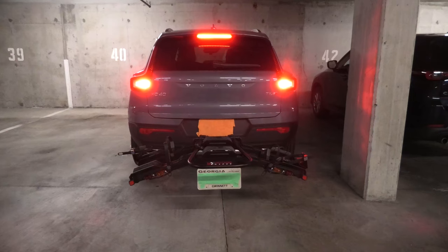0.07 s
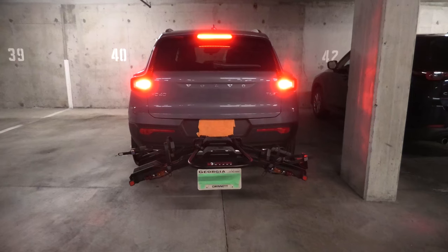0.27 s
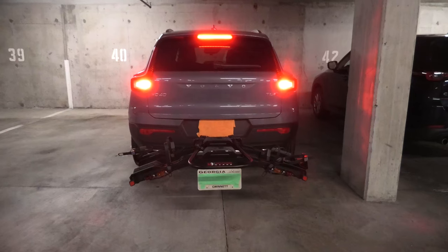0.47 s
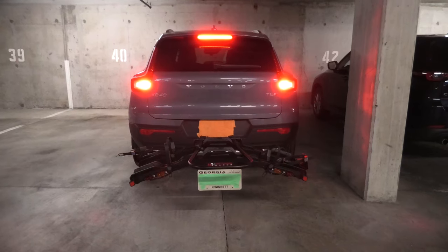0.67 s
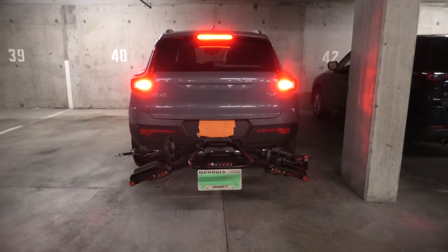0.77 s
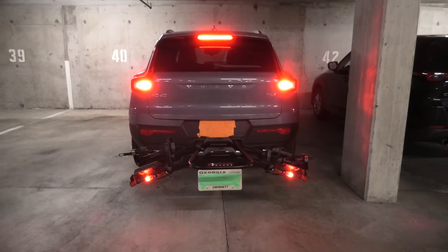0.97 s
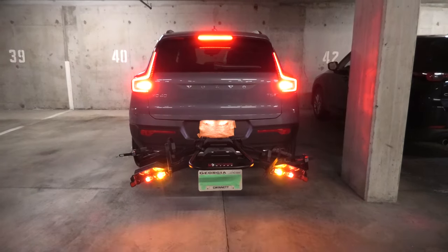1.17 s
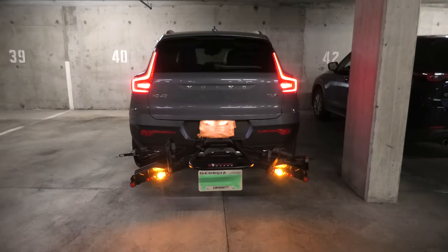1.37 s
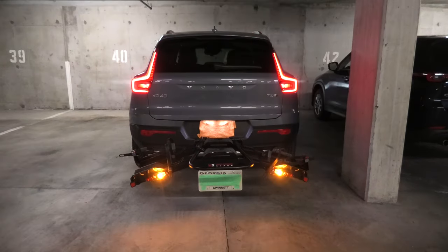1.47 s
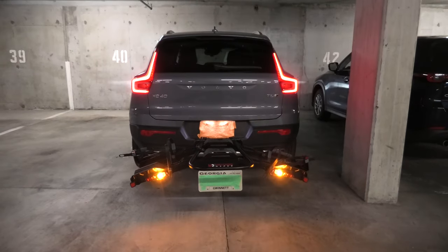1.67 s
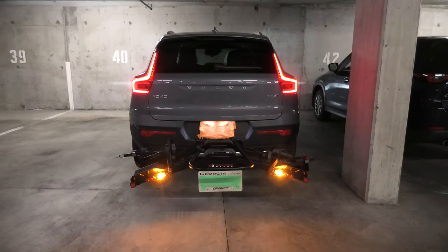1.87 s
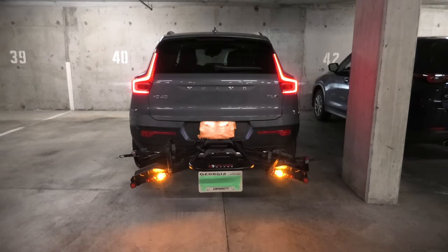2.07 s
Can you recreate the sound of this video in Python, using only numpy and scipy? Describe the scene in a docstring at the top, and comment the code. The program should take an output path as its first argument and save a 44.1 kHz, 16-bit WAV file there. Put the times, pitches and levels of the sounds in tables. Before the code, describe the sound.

Car starting up, heard from behind, its starter grinding before the engine flares and settles, echoing off concrete

```python
"""A car is started in a concrete garage, heard from behind: over steady air noise the starter pinion clunks in,
the starter grinds through the compressions, the engine catches, flares and settles toward idle.
The clunks are ringing modes and rattle, the starter is gear-tooth knocks and hiss, the engine is firing orders
and noise bands that pulse with each firing. Walls and ceiling answer every part, in stereo."""
import sys
import numpy as np
from scipy import signal
from scipy.fft import rfft, irfft, next_fast_len
from scipy.io import wavfile
from scipy.ndimage import map_coordinates

SR = 44100
rng = np.random.default_rng(int(sys.argv[2]) if len(sys.argv) > 2 else 0)


def store_pcm(level_fs):
    """Save levels as 16-bit WAV."""
    pcm = np.round(np.clip(level_fs, -1, 1) * 32767).astype(np.int16)
    wavfile.write(sys.argv[1], SR, np.atleast_2d(pcm).T)


def voltage_ratio(decibels):
    """Convert decibels (scalar or array-like) to amplitude ratios, 20 dB per decade."""
    exponent = np.asarray(decibels, float) / 20
    return 10 ** exponent


N = 93977


def unit(x):
    """Scale to rms 1."""
    return x / np.sqrt(np.mean(x ** 2) + 1e-20)


def along(points, hz):
    """Read (Hz, value) points on a log frequency axis."""
    f, v = np.transpose(points)
    return np.interp(np.log(hz + 1), np.log(f + 1), v)


def curves(rows):
    """One value per sample for each column after the time."""
    s, *cols = np.transpose(rows)
    return [np.interp(np.arange(N) / SR, s, c) for c in cols]


def wobble(rate):
    """A smooth random curve, rate knots a second."""
    knots = rng.standard_normal(int(N * rate / SR) + 4)
    return map_coordinates(knots, [np.arange(N) * rate / SR])


def filtered(x, response):
    """Filter x by a response given as a function of frequency in Hz."""
    m = next_fast_len(N + SR // 2)
    return irfft(rfft(x, m) * response(np.fft.rfftfreq(m, 1 / SR)), m)[..., :N]


def coloured(x, spectrum):
    """Weight x by a spectrum, at rms 1."""
    return unit(filtered(x, lambda hz: voltage_ratio(along(spectrum, hz))))


def resonance(f, hz, width):
    """The causal response of one damped resonance, unity at its centre."""
    return 1j * f * width / (hz * hz - f * f + 1j * f * width)


def pulses(cycles, scatter, size_db, pattern_db=(0,)):
    """One impulse each time cycles passes a whole number, uneven in time (in cycles) and size."""
    whole = np.arange(int(cycles[-1]))
    draw = rng.standard_normal((len(whole), 2))
    at = np.interp(whole + scatter * draw[:, 0], cycles, np.arange(N)).astype(int)
    size = voltage_ratio(size_db * draw[:, 1] + np.resize(pattern_db, len(whole)))
    return np.bincount(at, size, N)


def air():
    """The garage's steady ventilation noise, partly shared by the two ears."""
    # Each row: frequency in Hz, level in dB per Hz.
    air_spectrum = [(24, -30), (45, -12), (135, -2), (180, -8), (240, 0), (382, -11), (502, -12), (659, -5),
                    (1170, -9), (1960, -16), (5250, -37), (15800, -33)]
    level_db = -47.5
    noise = rng.standard_normal((3, N))
    return voltage_ratio(level_db) * coloured(noise[0] + 0.44 * noise[1:], air_spectrum)


def garage(x):
    """Concrete walls: a different tail for each ear, each frequency dying at its own speed."""
    # How long the tail rings. Each row: frequency in Hz, time to fall 60 dB in seconds.
    decay_times = [(100, 3.5), (1000, 1.08), (4000, 1.64), (12000, 0.68)]
    # Tone of the walls. Each row: frequency in Hz, gain in dB on a tail of unit energy.
    wall_gain = [(30, -16), (125, -18), (300, -8), (700, -4), (1200, -1.5), (2500, -2), (5000, -10),
                 (8000, -13), (10500, -9), (13000, -9), (15000, -10)]
    hz, t, z = signal.stft(rng.standard_normal((2, SR)), SR, nperseg=256)
    decay = voltage_ratio(-60 * t / along(decay_times, hz)[:, None])
    tail = signal.istft(z * decay, SR, nperseg=256)[1]
    tail = np.pad(tail / np.linalg.norm(tail[0]), ((0, 0), (400, 0)))  # 400 samples before the answer
    tail = filtered(tail, lambda f: voltage_ratio(along(wall_gain, f)))
    return signal.fftconvolve(x[None], tail, axes=1)[:, :N]


def electric_whine():
    """A thin, steady-pitched electric whine switches on and flutters in level and phase."""
    hz, level_db, from_s, rise_s = 10000, -63, 1.5, 0.093
    t = np.arange(N) / SR
    level = np.clip((t - from_s) / rise_s, 0, 1) * voltage_ratio(level_db + 3.06 * wobble(30))
    return level * np.sin(2 * np.pi * hz * t + .8 * wobble(39.4))


def clunks():
    """The pinion hits the ring gear and bounces: ringing metal and a noisy rattle."""
    # The hits. Each row: start in seconds, gain in dB, rattle's time to fall 60 dB in seconds.
    hits = [(0.2292, -25, 0.14), (0.2409, -12.5, 0.037), (0.2446, -10, 0.034), (0.2615, -13, 0.029),
            (0.2649, -15.5, 0.035), (0.2694, -13.5, 0.046)]
    # The struck metal. Each row: frequency in Hz, mean relative level in dB, time to fall 60 dB in seconds.
    metal_modes = [(560, -6, .05), (855, -8, 0.03), (1130, 0, 0.04), (1430, 1, 0.055), (1800, -3, .04),
                   (2810, -3, 0.05), (6560, -4, 0.025), (8300, -14, .03)]
    # Tone of the rattle. Each row: frequency in Hz, level in dB per Hz.
    rattle_spectrum = [(150, -51), (250, -28), (518, -8), (1280, -7), (1440, -2), (1600, -6.5), (2690, -19),
                       (3260, -40), (4380, -17), (8030, -11.5), (15800, -24.5)]
    rise_s = 0.00099
    out, t = np.zeros(N + SR), np.arange(SR // 3) / SR
    rattle = coloured(rng.standard_normal(N), rattle_spectrum)
    for s, db, t60 in hits:
        ring = sum(voltage_ratio(lv + rng.normal(0, 3.0) - 60 * t / d) * np.sin(2 * np.pi * hz * t)
                   for hz, lv, d in metal_modes)
        i = round(s * SR)
        dying_rattle = voltage_ratio(-60 * t / t60) * rattle[i:i + len(t)]
        hit = 0.47 * ring / np.abs(ring).max() + 0.44 * dying_rattle
        out[i:i + len(t)] += voltage_ratio(db) * (1 - np.exp(-t / rise_s)) * hit
    return out[:N]


def starter():
    """Gear teeth knock the housing unevenly; the motor hisses; both fade once the engine runs."""
    # Cranking over time. Each row: time in seconds, gear growl in dB, three housing rings (near 560, 900
    # and 1400 Hz) in dB ahead of the trim below, hiss in dB, top of the hiss in dB.
    cranking = [(0.28, -29, -35, -32, -32, -32.5, -38), (0.302, -30, -36, -40, -40, -34, -44),
                (0.345, -29.5, -34, -27.5, -26.5, -34.5, -49), (0.396, -27, -35, -35, -40, -37, -50),
                (0.432, -30, -41, -47, -28.5, -36, -51), (0.48, -34, -35, -45, -28, -36.5, -53),
                (0.496, -30, -36, -32, -36, -38.5, -43.5), (0.54, -27.5, -43, -26, -39, -38, -48),
                (0.586, -33.5, -37, -30, -40, -36.5, -58), (0.612, -31, -35, -33, -43, -41, -54),
                (0.626, -29.5, -25.5, -49, -47, -37, -39.5), (0.646, -25, -40, -23, -37, -37, -41),
                (0.658, -31.5, -41, -28, -52, -37, -42), (0.698, -30, -30.5, -43, -53, -32.5, -44),
                (0.718, -31, -36, -36, -48, -39.5, -46), (0.736, -30.5, -43, -45, -62, -31.5, -40.5),
                (0.784, -37, -33, -32, -45, -31.5, -40.5), (0.804, -30, -43, -31, -53, -34.5, -37.5),
                (0.828, -33.5, -40, -41, -35, -36, -47), (0.846, -29.5, -31, -33, -33.5, -38.5, -38),
                (0.888, -35, -43, -54, -54, -39.5, -48.5), (0.95, -33, -40.5, -35, -40, -41.5, -49)]
    # Broad housing resonances. Each row: centre in Hz, width in Hz, level in dB.
    housing_modes = [(546, 73, -3), (1172, 120, -4.5), (2140, 160, -6), (2520, 54, -6)]
    # Rings that swell with load. Each row: centre in Hz, width in Hz ahead of squaring the response.
    load_rings = [(555, 110), (890, 200), (1410, 160)]
    # Tone of growl, hiss and top hiss. Each row: frequency in Hz, level in dB per Hz.
    growl_spectrum = [(30, -70), (90, -30), (170, -14), (385, -10), (550, -3), (707, -8), (890, -4),
                      (1030, -9), (1410, -7), (1640, -11), (2130, -7.5), (6000, -20), (7800, -45),
                      (13200, -120)]
    hiss_spectrum = [(2350, -9.5), (4000, -3), (5100, -12), (5730, -1), (6220, -4), (9300, -7),
                     (12100, -34), (20500, -120)]
    top_spectrum = [(5470, -14), (9300, -3.5), (11200, 1.5), (13600, -9), (15800, -12)]
    from_s, rise_s, dies_db_per_s = 0.2232, 0.02, 50
    teeth_per_s, tooth_scatter = 420, 0.439  # scatter as a share of the tooth spacing
    ring_trim_db = -5.5

    t = np.arange(N) / SR
    growl_db, *ring_db, hiss_db, top_db = curves(cranking)
    gate = np.clip((t - from_s) / rise_s, 0, 1)
    gate = gate * voltage_ratio(-dies_db_per_s * np.clip(t - cranking[-1][0], 0, None))
    teeth = pulses(t * teeth_per_s, tooth_scatter, size_db=0)

    def housing(f):
        """Resonances in alternating polarity, with the bass rolled off below 250 Hz."""
        modes = sum((-1) ** k * voltage_ratio(db) * resonance(f, c, w) for k, (c, w, db) in enumerate(housing_modes))
        return modes * f ** 2 / (f ** 2 + 250 ** 2)

    knocks = unit(filtered(teeth, housing))
    growl = unit(0.33 * knocks + coloured(rng.standard_normal(N), growl_spectrum))
    rings = 0
    for db, (c, w) in zip(ring_db, load_rings):
        ring = unit(filtered(teeth, lambda f: resonance(f, c, w) ** 2))
        rings = rings + voltage_ratio(db + ring_trim_db + 2 * wobble(30)) * ring
    grit = rng.standard_normal(N) * voltage_ratio(1.2 * wobble(90))
    hiss = voltage_ratio(hiss_db) * coloured(grit, hiss_spectrum) + voltage_ratio(top_db) * coloured(grit, top_spectrum)
    return gate * (voltage_ratio(growl_db + .7 * wobble(25)) * growl + rings + hiss)


def exhaust_note(cycles, fire):
    """Low multiples of the firing rate sing over noise and pulses from the firings."""
    # Each row: multiple of the firing rate, mean peak level in dB against the rms of the noisy part.
    firing_orders = [(1, -8), (2, -6), (3, -11), (4, -12.5)]
    # Each row: frequency in Hz, level in dB per Hz.
    exhaust_spectrum = [(12, -38), (20, -38), (75, 3.5), (102, -0.5), (166, 1), (193, 0), (226, -9.5),
                        (260, -5), (340, -38), (570, -120)]
    orders = sum(voltage_ratio(db + 2.5 * wobble(12)) * np.sin(2 * np.pi * k * cycles + rng.uniform(0, 6))
                 for k, db in firing_orders)
    return orders + coloured(rng.standard_normal(N) + 0.39 * unit(fire), exhaust_spectrum)


def body_roar(cycles, fire):
    """Noise swells with each firing and rings the hollows of pipe and floor pan."""
    # Each row: frequency in Hz, level in dB per Hz.
    roar_spectrum = [(71, -31), (120, -28), (226, 0), (288, -8.5), (342, -0.5), (479, 0.5), (527, -2.5),
                     (658, -2.5), (962, -4.5), (1130, -11), (1500, -14), (1950, -39), (3300, -120)]
    # Hollows of pipe and floor pan. Each row: centre in Hz at time zero, width in Hz ahead of squaring
    # the response, relative level in dB.
    hollow_modes = [(232, 30, -4), (348, 38, 0), (470, 42, -2), (640, 45, 0), (765, 42, 0), (890, 45, -4)]
    hollows_db, sinks_per_s = -6.5, .02  # level over the roar; share of pitch lost per second
    t = np.arange(N) / SR
    noise = rng.standard_normal(N)
    swell_db = 1.1 * np.cos(2 * np.pi * cycles) + 0.4 * wobble(13.3)
    roar = coloured(noise * voltage_ratio(swell_db) + 0.3 * unit(fire), roar_spectrum)
    hollows = filtered(noise + .5 * unit(fire),
                       lambda f: sum(voltage_ratio(db) * resonance(f, c, w) ** 2 for c, w, db in hollow_modes))
    drift = (t - sinks_per_s * t ** 2 / 2) * SR  # read ever slower, so the pitch sinks
    return unit(roar + voltage_ratio(hollows_db) * unit(map_coordinates(hollows, [drift])))


def valve_clatter(cycles):
    """Two uneven ticks per firing, in noise that swells with each firing."""
    # Each row: frequency in Hz, level in dB per Hz.
    clatter_spectrum = [(590, -28), (1000, -8), (1070, -11.5), (1300, -12), (1700, -9.5), (2000, -5.5),
                        (2320, -11.5), (2790, -14.5), (3300, -14), (3910, -13), (4870, -20.5),
                        (6060, -23.5), (7720, -23), (8300, -22.5), (8900, -30.5), (9600, -24), (10400, -27),
                        (11000, -22), (11800, -28), (13400, -30.5), (15800, -41)]
    ticks = pulses(2 * cycles, scatter=.08, size_db=3)
    swell_db = 0.49 * np.cos(2 * np.pi * cycles) + .5 * wobble(29.93)
    return coloured(rng.standard_normal(N) * voltage_ratio(swell_db) + 0.14 * unit(ticks), clatter_spectrum)


def intake_whistle(hz):
    """A narrow band of noise carried along a gliding pitch."""
    width_hz = 110
    a, b = filtered(rng.standard_normal((2, N)), lambda f: np.exp(-(f / width_hz) ** 2))
    turn = 2 * np.pi * np.cumsum(hz) / SR
    return unit(a * np.cos(turn) + b * np.sin(turn))


def engine():
    """Uneven firings drive exhaust, roar and clatter at one shared rate; the intake whistles."""
    # The run over time. Each row: time in seconds, firings per second, exhaust in dB, body roar in dB,
    # clatter in dB, intake whistle in Hz, whistle in dB.
    running = [(.55, 13.2, -79, -52, -43, 2150, -75), (.695, 16.2, -60, -56, -50, 2150, -40),
               (.715, 20.2, -37, -39.5, -33, 2150, -43), (.8, 25, -42.5, -39.5, -44, 2100, -42),
               (.87, 32, -38, -34.5, -35, 2084, -54), (.93, 33.6, -30.5, -33, -42, 2068, -47),
               (.96, 38, -38, -33.5, -36.5, 2062, -51), (.99, 41, -27.5, -32.5, -34.5, 2046, -42),
               (1.03, 42, -37.5, -29.5, -34, 2036, -45), (1.1, 44.4, -37, -29, -33.5, 2030, -51),
               (1.25, 42.7, -41, -28.5, -36, 2011, -43), (1.38, 42, -37, -31, -36.5, 2003, -56),
               (1.5, 41, -40, -30, -37.5, 2029, -45), (1.62, 38.5, -43.5, -29.5, -37.5, 2000, -39.5),
               (1.75, 36, -40.5, -31.5, -38.5, 1943, -52), (1.9, 34.6, -41, -32, -39, 1859, -47),
               (2.13, 33.8, -37, -32, -39, 1840, -51)]
    # Strength of four firings in turn, in dB.
    cylinder_db = [-1.8, -1.5, 0.19, 0.42]
    rate, exhaust_db, roar_db, clatter_db, whistle_hz, whistle_db = curves(running)
    cycles = np.cumsum(rate) / SR
    fire = pulses(cycles, scatter=.04, size_db=2, pattern_db=cylinder_db)
    out = voltage_ratio(exhaust_db) * exhaust_note(cycles, fire)
    out += voltage_ratio(roar_db) * body_roar(cycles, fire)
    out += voltage_ratio(clatter_db) * valve_clatter(cycles)
    out += voltage_ratio(whistle_db) * intake_whistle(whistle_hz)
    return (np.arange(N) / SR > running[0][0]) * out


def scene():
    """Car, walls and air."""
    car = electric_whine() + clunks() + starter() + engine()
    return car + garage(car) + air()


def low_pass(x):
    """Removes everything above the highest recorded frequency."""
    return signal.sosfilt(signal.butter(12, 16130, fs=SR, output="sos"), x)


def record(dry):
    """The two microphones differ in level and phase by band; the sound opens abruptly out of silence."""
    # Level between the ears. Each row: frequency in Hz, left minus right in dB.
    ear_balance = [(40, -3.2), (125, -1.5), (300, 1.2), (950, .4), (3000, .2), (15000, .1)]
    # Phase between the ears. Each row: frequency in Hz, radians by which left leads.
    ear_lead = [(0, 0.39), (260, 0.27), (1290, -0.47), (2410, 0.31), (4910, 0.34), (15700, -0.51)]
    top_hz, open_s, open_fade_s = 15820, 0.08, 0.0084

    def microphones(hz):
        """Half of the difference goes to each side; nothing passes from top_hz up."""
        difference = voltage_ratio(along(ear_balance, hz)) * np.exp(1j * along(ear_lead, hz))
        return (hz < top_hz) * difference ** np.array([[.5], [-.5]])

    opening = np.clip((np.arange(N) / SR - open_s) / open_fade_s, 0, 1)
    return low_pass(filtered(dry, microphones) * opening)


dry = scene()
out = record(dry)
store_pcm(out)
```